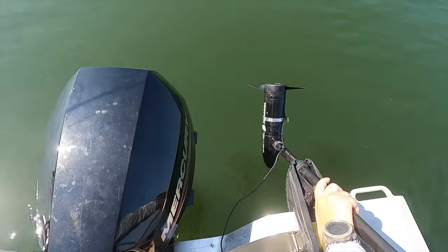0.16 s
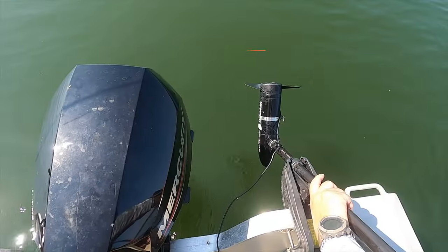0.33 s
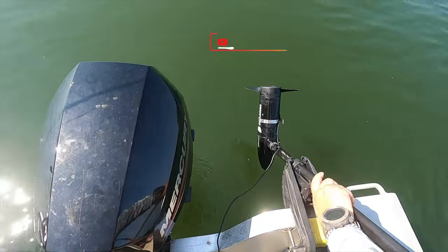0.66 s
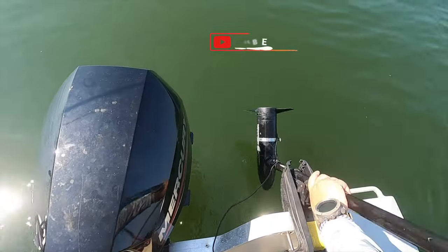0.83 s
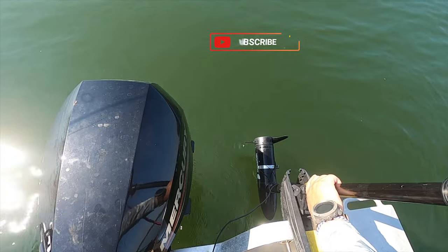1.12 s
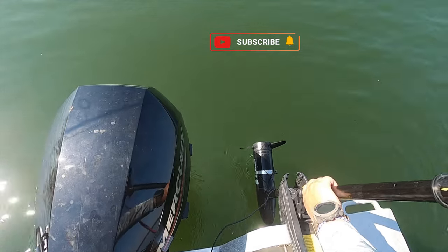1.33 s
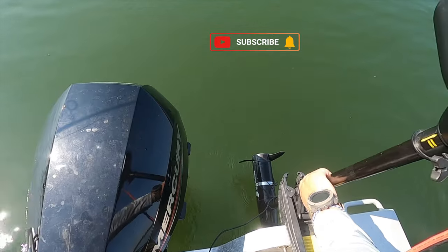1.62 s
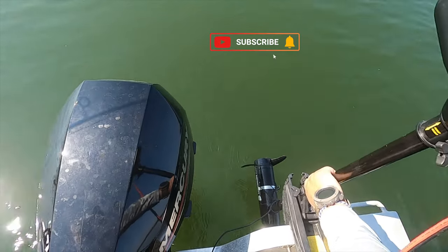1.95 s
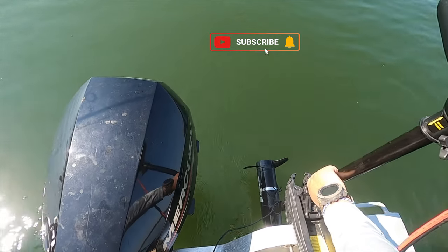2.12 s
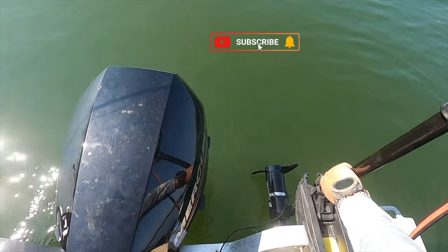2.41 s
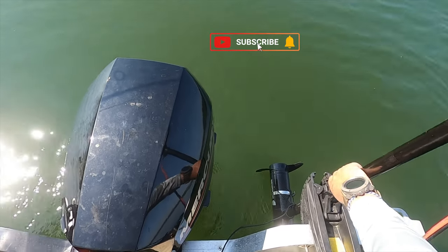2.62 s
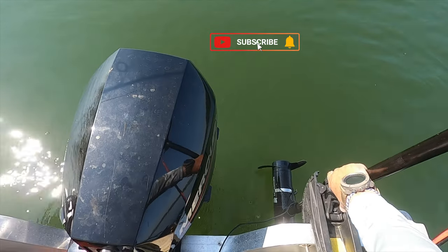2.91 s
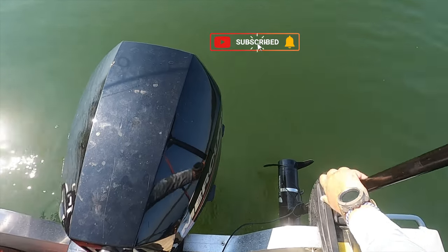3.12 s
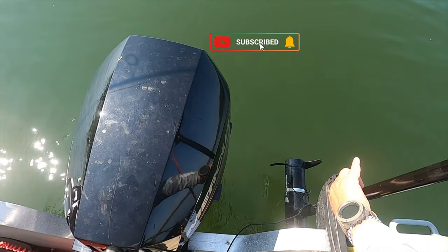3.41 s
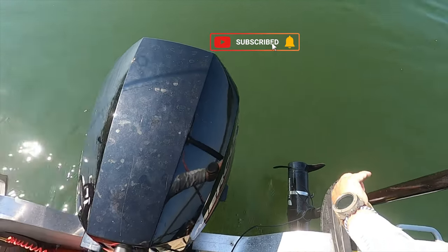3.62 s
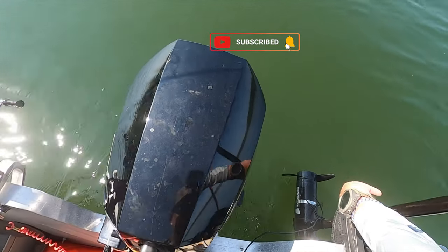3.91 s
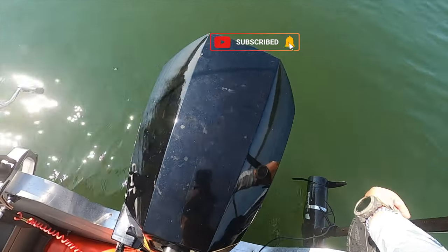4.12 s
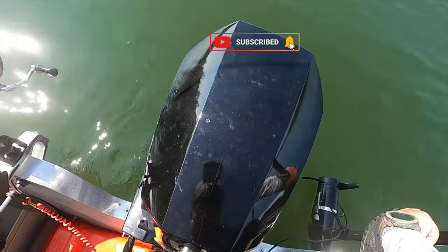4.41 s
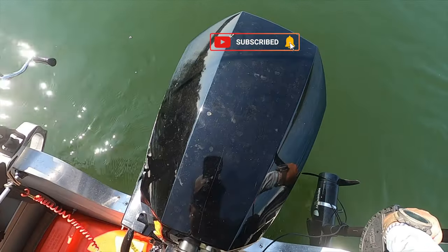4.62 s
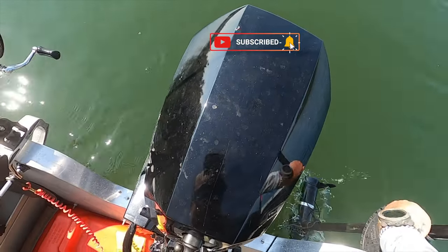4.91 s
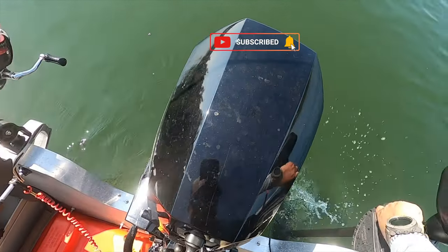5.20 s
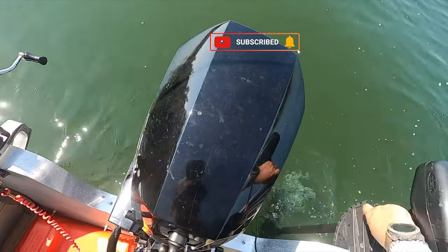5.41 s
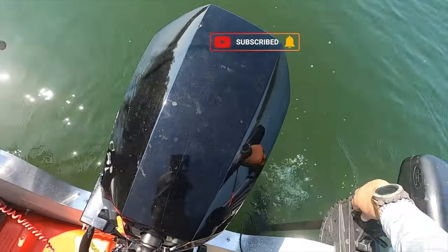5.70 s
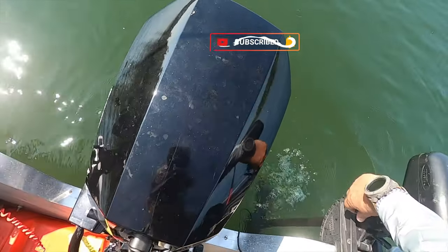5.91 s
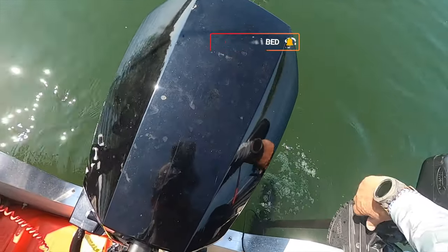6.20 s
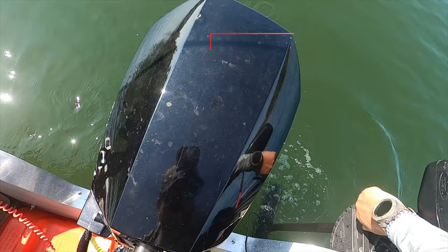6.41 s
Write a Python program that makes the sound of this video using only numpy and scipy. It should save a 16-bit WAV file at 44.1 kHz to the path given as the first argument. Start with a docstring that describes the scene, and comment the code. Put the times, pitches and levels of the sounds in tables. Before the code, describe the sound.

Outdoors on a lake, close stereo microphone worn by the person handling a small outboard on a metal boat. A low, wavering motor hum and soft rumble run throughout, with a faint high insect hiss on the left. From 0.1 s the bracket clacks lightly; a hard clunk lands at 0.65, then dense knocks, gritty scraping and wet slosh peak around 0.95-1.15. It quiets from 1.3 to 2.1, with only faint ticks. A tight clatter with a short scrape comes at 2.4-2.6. From 3 to 4.8 there are sparse small knocks, soft rubbing and tiny chirpy squeaks, notably near 3.75. At 4.9 sliding and clunks resume, building to the loudest rapid thunks at 5.05-5.2, with a deep hull boom and splash. Loose rattles fade by 5.5; small drips and bubbly plips continue over the hum to 6.5.

```python
"""Outboard tipped over a boat's stern

A hand tips a small electric outboard over the stern of a metal boat: its bracket clacks and slides, then drops home
with a boom through the hull and a splash. Contacts are noise bursts ringing modes; water, rubbing and rumble are
shaped noise under gain curves. A motor hums low as wavering tones, water laps and drips as random ringing clicks
and short sines, and insects hiss from the shore as a band of noise.
"""
import sys
import numpy as np
from scipy import signal
from scipy.fft import rfft, irfft
from scipy.io import wavfile
from scipy.ndimage import uniform_filter1d

SR = 44100
rng = np.random.default_rng(int(sys.argv[2]) if len(sys.argv) > 2 else 0)


def log_audio(samples):
    """Write samples as a 16-bit WAV file to the path given in sys.argv[1]."""
    # one column per channel
    frames = np.atleast_2d(samples).T
    # limit to full scale, then quantise
    limited = np.clip(frames, -1, 1)
    pcm = np.round(limited * 32767).astype(np.int16)
    wavfile.write(sys.argv[1], SR, pcm)


N = 288855

# blows on bracket and clamp; clack and crack are relative to the body of the blow, hull to its level:
# start_s, level_db, brightest_hz, clack_db, crack_db, decay_60db_s, hull_db
BLOWS_ON_BRACKET = [(.034, -42, 1480, 1, -15, .046, 6), (.082, -15.5, 1530, -5, -26.5, 0.052, -22),
                    (.102, -27, 1150, -33, -40, 0.084, -19), (.145, -27, 1320, -5, -32, 0.09, -28),
                    (0.199, -42, 900, -1, -32, .034, 17), (0.275, -46, 2500, -2, -29, 0.042, 14),
                    (.315, -29.5, 610, -33, -39, 0.023, 6), (0.402, -28.5, 1780, 2.5, -51, 0.081, 3),
                    (.461, -31.5, 566, -13, -33, 0.068, -13), (0.516, -45.5, 4600, 4, -21, 0.056, -10),
                    (.564, -42, 657, -21, -20, .047, -11), (.587, -37.5, 2210, 3, -17, 0.13, -16),
                    (.655, -8.5, 1890, -5.5, -21.5, 0.039, 3.5), (.687, -28, 540, -21, -31, .05, -11),
                    (.748, -31.5, 605, 2.5, -29, 0.055, -9), (0.798, -27, 560, -27, -39, .045, -16),
                    (.833, -28, 1120, -6, -37, 0.056, 7), (.848, -27, 506, -1.5, -33, 0.25, -7),
                    (.865, -25.5, 1630, 4, -29, .054, 8), (.882, -25.5, 1600, -6, -34, 0.12, 13),
                    (.947, -10, 1030, -0.5, -17, 0.12, -33), (.968, -10, 1110, -26, -20, 0.18, 6),
                    (.991, -23.5, 1110, -12, -7, 0.14, 1), (1.021, -4.5, 740, -7, -15, 0.058, -21),
                    (1.063, -34.5, 664, -14, -27, 0.055, 20.5), (1.099, -19.5, 1220, -25, -36, .086, -6),
                    (1.108, -22.5, 686, -9, -34, 0.058, -4), (1.125, -12, 1184, -2, -55, 0.068, -24),
                    (1.147, -45, 1700, -28, -15, 0.12, 16), (1.217, -26.5, 1620, -37, -26, .088, 5.5),
                    (1.246, -33.5, 1010, -29, -38, 0.043, -17.5),
                    (1.342, -36.5, 1320, -33, -35.5, 0.056, -10.5), (1.539, -51, 517, -33, -27.5, .042, 19),
                    (1.859, -48.5, 534, -9, -28, 0.15, 24), (2.139, -50.5, 2110, 9.5, -3, 0.19, -5),
                    (2.17, -24.5, 810, -2.5, -11.5, 0.059, -22), (2.33, -48, 1660, -25, -22, 0.1, 13),
                    (2.418, -12, 1210, -10, -20, .093, -37.5), (2.461, -12, 1250, -14, -27, 0.13, -29),
                    (2.479, -15, 1700, -2, -50, 0.13, -8), (2.495, -18.5, 650, -21, -31, 0.039, -27.5),
                    (2.507, -26.5, 805, -29, -27, 0.032, 14.5), (2.544, -20, 990, -15, -39, 0.064, -20),
                    (2.57, -29.5, 630, -2.5, -29, 0.08, -17), (2.588, -20.5, 820, -17, -50, 0.13, -39),
                    (2.624, -28.5, 715, -26, -39, 0.088, -6), (2.678, -40.5, 552, -17, -23, .08, 14.5),
                    (2.697, -39.5, 740, -24, -16.5, 0.18, 8.5), (2.966, -41, 1475, -15, -38, 0.14, 2.5),
                    (3.008, -43.5, 546, -4, -21, 0.54, 2), (3.052, -28, 1230, -1, -24, 0.24, -12),
                    (3.089, -27.5, 2230, -28, -23, 0.2, -12), (3.404, -48.5, 2000, -20, -18, 0.54, -10),
                    (3.474, -43, 685, -14, -22, 0.21, -9), (3.523, -44.5, 596, -22, -25, 0.05, -3),
                    (3.6, -45.5, 4500, -10, -19, 0.036, 0), (3.697, -44, 1000, -34, -15, 0.25, 11.5),
                    (3.751, -29.5, 1830, -5, -28, 0.082, -25), (3.767, -32, 557, -13, -21, 0.087, -7),
                    (3.936, -46, 1210, -4, -23, 0.049, 15.5), (4.045, -42.5, 1810, -21, -10, 0.14, -14),
                    (4.087, -34, 506, -25, -20, 0.071, -2), (4.138, -34, 590, -24, -26, .024, -17),
                    (4.163, -37.5, 830, -30, -31, 0.27, 12), (4.332, -49.5, 2400, 19, -27, 0.12, -15),
                    (4.771, -28, 677, -21.5, -34, 0.46, -2), (4.812, -34.5, 1080, -22, -27, .054, 8),
                    (4.873, -37.5, 902, -3, -15, 0.18, 18.5), (4.909, -25, 1690, 7.5, 2, .027, -22),
                    (4.94, -30, 547, 7.5, -17, 0.08, -14), (4.96, -7.5, 437, -11, -25, 0.057, -41),
                    (4.997, -23.5, 1170, 0.5, -9.5, 0.18, -16), (5.041, -19.5, 970, -0.5, -30, 0.091, -22),
                    (5.066, -8.5, 870, -16, -31, 0.035, -31), (5.099, 0.5, 785, -19, -27, 0.07, -44),
                    (5.124, -1, 653, -5, -19, 0.042, -23), (5.13, -8.5, 570, 4.5, -30, 0.022, 10.5),
                    (5.144, -8.5, 1290, -22, -32, 0.22, -15), (5.175, -16.5, 580, -3, -27, 0.06, 11),
                    (5.207, -4, 2360, 2.5, -12.5, 0.074, 7.5), (5.322, -25.5, 623, 0.5, -35, 0.15, 8),
                    (5.349, -28, 1060, -23, -19, 0.091, 9), (5.446, -28.5, 660, -28, -37, 0.1, -16),
                    (5.463, -31, 1260, 0, -10, 0.21, 4), (5.512, -33, 2100, -4, -15, 0.16, -13)]
# strokes of the shaft in its clamp, and a few airy rustles, perhaps of a sleeve;
# at full strength from start_s; rise and fall span 20 dB:
# start_s, rise_s, hold_s, fall_s, slosh_db, rub_db, swish_db
STROKES_AND_RUSTLES = [(.09, 0.034, .005, 0.067, -41.5, -64, -88), (.44, 0.03, 0.004, 0.061, -45, -73, -95),
                       (.66, 0.021, 0.0079, 0.095, -35, -57, -87), (.77, 0.084, 0.21, .05, -45.5, -56, -80),
                       (.96, 0.037, 0.074, 0.023, -30.5, -36, -68),
                       (1.11, 0.061, .005, 0.085, -32.5, -56, -100),
                       (2.26, 0.15, 0.064, 0.12, -63, -68.5, -81),
                       (2.48, 0.059, 0.0083, 0.055, -33.5, -40, -93),
                       (3.07, .03, 0.025, 0.093, -45, -51, -75), (3.14, .2, 0.042, 0.25, -58.5, -55, -70),
                       (4.12, 0.23, 0.017, 0.17, -50, -58, -69.5),
                       (4.42, 0.072, 0.04, 0.11, -59.5, -70, -111),
                       (4.7, 0.17, 0.31, .05, -59.5, -56.5, -76),
                       (4.94, 0.062, 0.13, 0.08, -33.5, -40, -61.5),
                       (5.1, 0.09, 0.12, 0.044, -23.5, -34, -55),
                       (5.27, 0.036, 0.071, 0.2, -38, -51.5, -69),
                       (5.46, 0.078, 0.039, 0.093, -53, -57, -75), (5.74, 0.11, 0.048, .1, -51, -67, -85)]
# the same three sounds in between: time_s, slosh_db, rub_db, swish_db
BETWEEN_STROKES = [(0, -62, -61.5, -91), (1.3, -63.5, -69.5, -95), (2.0, -71.5, -71.5, -103),
                   (2.8, -77, -75, -100), (3.5, -71.5, -68, -100), (5.2, -69, -66, -90),
                   (5.8, -58, -62, -75.5), (6.55, -61.5, -66, -81)]
# lurches of the hull; the fall spans 20 dB: start_s, fall_s, rumble_db, heave_db
HULL_LURCHES = [(.09, 0.15, -39, -67), (.32, .2, -60, -42), (.38, 0.11, -62, -47), (.44, 0.25, -42.5, -65),
                (0.662, 0.097, -24.5, -47), (.78, 0.067, -31.5, -57), (1.04, 0.068, -28.5, -48),
                (1.13, 0.12, -35, -32), (1.46, 0.051, -51, -47), (1.55, 0.047, -40.5, -72),
                (1.85, 0.32, -48.5, -52), (2.45, 0.55, -40.5, -41), (2.57, 0.64, -43, -48),
                (2.7, 0.049, -49, -34), (4.45, .1, -48.5, -50), (4.878, 0.089, -32.5, -53),
                (5.135, 0.15, -12, -10.5), (5.23, 0.16, -18.5, -19), (5.4, 0.13, -40, -31.5),
                (5.62, 0.14, -45, -57), (5.76, 0.067, -44, -65), (6.1, 0.25, -55, -65)]
# the motor as the hull carries it: time_s, hum_db, rumble_db
MOTOR_LEVELS = [(0, -51.5, -44.5), (1.2, -36.5, -49), (1.55, -56.5, -55.5), (2.1, -43, -53.5),
                (2.7, -41.5, -60.5), (4.3, -37.5, -52.5), (4.9, -42.5, -51.5), (5.7, -43, -44),
                (6.55, -41, -45)]


def knocks():
    """Impact excitation: hard blows ring the bracket modes strongly."""
    return blows(BLOWS_ON_BRACKET, rise=.00119, modal=1.1, lag=2)


def blows(table, rise, modal, lag):
    """Modal excitation: a contact chatters in ragged rebounds, rings modes near its brightest pitch, clacks and cracks."""
    # modes of the bracket: mode_hz, level_db, decay_60db_s
    bracket_modes = [(411.2, 3.5, 0.1), (512, -3.5, 0.084), (583.5, -7, 0.075), (677, -41, 0.02),
                     (900, -30, 0.055), (1110, 11.5, 0.019), (1263, 5, 0.017), (1660, 11, 0.017),
                     (1745, -13.5, 0.12), (2012, 8, 0.0078), (2220, -0.5, 0.012), (2700, 8, 0.011),
                     (3346, -7, 0.021), (3460, 0.5, 0.0068), (4530, 15, 0.0061)]
    # the microphone turns with its wearer, so the bracket moves across: time_s, left_minus_right_db
    bracket_pan = [(0, -1.5), (1.3, -2), (1.9, 4), (2.25, 0), (2.45, -2.5), (2.9, -3.5), (3.1, 7.5),
                   (4.2, -3), (4.75, -3), (5.5, -1), (6.55, 4)]
    out, size = np.zeros((2, N)), int(.22 * SR)
    pans = in_time(bracket_pan)[0]
    t = np.arange(size) / SR
    clack_band = signal.butter(2, [1900, 4600], "band", fs=SR, output="sos")
    crack_band = signal.butter(2, [5000, 10500], "band", fs=SR, output="sos")
    plastic = signal.butter(2, 7000, fs=SR, output="sos")   # padded parts swallow the highest ring
    small = signal.butter(2, 260, "high", fs=SR, output="sos")   # small parts radiate no bass
    for s, db, hz, clack_db, crack_db, t60, *_ in table:
        fade = np.minimum(t / rise, 1) ** 2 * amp(-60 * np.maximum(t - rise, 0) / t60)
        uneven = amp(3.5 * np.repeat(rng.standard_normal(size // 40 + 1), 40)[:size])
        chatter = rng.standard_normal((4, size)) * fade * uneven
        chatter[:, int(rise * SR)] += 4.0      # the first touch is the hardest
        body = ring(chatter[0], hz, 7.5 / hz)

        rings = np.zeros(size)
        for mode_hz, level_db, ring_s in bracket_modes:
            nearness_db = -2.3 * np.log2(mode_hz / hz) ** 2
            mode_gain = amp(level_db + rng.normal(0, 4) + nearness_db)
            rings += mode_gain * ring(chatter[0] * fade, mode_hz, ring_s)
        body = peak_one(peak_one(body) + modal * peak_one(rings))
        body = signal.sosfilt(small, signal.sosfilt(plastic, body))

        # shared chatter plus each port's own: the cracks differ more between the ports
        clacks = signal.sosfilt(clack_band, (chatter[1] + 0.21 * chatter[2:]) * fade)
        clacks = signal.sosfilt(plastic, clacks)
        cracks = signal.sosfilt(crack_band, (chatter[1] + 6.3 * chatter[2:]) * fade)
        i = round(s * SR)
        for side, start in enumerate([i + lag, i]):
            n, sign = min(size, N - start), 1 - 2 * side
            sound = body + amp(clack_db) * peak_one(clacks[side]) + amp(crack_db) * peak_one(cracks[side])
            out[side, start:start + n] += amp(db + pans[i] / 2 * sign) * sound[:n]
    return out


def hull():
    """Structure-borne sound: each knock reaches the hull as a rounded push and rings its modes."""
    # modes of the hull: mode_hz, level_db, decay_60db_s
    hull_modes = [(49.4, -16.5, 0.18), (88.6, -15, 0.14), (118.8, -13, 0.43), (148, 12, 0.16),
                  (213, -19.5, 0.36), (351.4, 7.5, 0.13)]
    push = np.zeros(N)
    for s, db, *_, hull_db in BLOWS_ON_BRACKET:
        push[round(s * SR)] = amp(db + hull_db)
    soft = signal.sosfilt(signal.butter(2, 500, fs=SR, output="sos"), push)
    return amp(-26) * sum(amp(level) * ring(soft, hz, t60) for hz, level, t60 in hull_modes)


def rub():
    """Friction noise: rubbing is made of random gritty clicks over noise."""
    # spectrum of the rubbing: frequency_hz, density_db
    rub_spectrum = [(880, -18), (1500, -0.5), (1650, -7), (2060, -7), (2630, -6.5), (3600, -6.5),
                    (4350, -5), (5880, -11), (6950, -13.5), (8000, -12.5), (10400, -44.5), (17600, -120)]
    grains = grit(1200 * amp(3.3 * drift(13.0)), 1.8, 0.48)
    sound = ports(shaped(grains, rub_spectrum), 1.41, 0.9)
    return sound * stroke_gains()[1] * amp(3.3 * drift(33))


def swish():
    """Broadband noise: dense fine clicks make the airy swish of strokes and rustles."""
    # spectrum of the swish: frequency_hz, density_db
    swish_spectrum = [(4590, -18.5), (7800, -11.5), (8550, 11.5), (10100, 3), (14200, -2), (15800, -44.5)]
    sound = ports(shaped(grit(3600, 2.5, .3), swish_spectrum), 4.5, 1.0)
    return sound * stroke_gains()[2] * amp(1.5 * drift(25)) * amp([[-1.5], [1.5]])


def slosh():
    """Random resonance: small bubbles and chatter each ring some cycles at a pitch of their own."""
    clicks = grit(900 * amp(5 * drift(10)), 3.6, .15)
    pitches, dealt = np.geomspace(450, 2600, 18), rng.integers(0, 18, N)
    patches = [4 * drift(7) for _ in range(6)]   # three neighbouring pitches swell together
    wet = 0
    for k, hz in enumerate(pitches):
        gain = amp(patches[k // 3] - 0.83 * np.log2(hz / 950) ** 2)
        wet = wet + gain * ring(clicks * (dealt == k), hz, 20.0 / hz)
    return ports(rms_one(wet), 2.3, 0.38) * stroke_gains()[0]


def splats():
    """Impact excitation: drops smack the surface with a faster rise and only faint modal ringing."""
    # drops: start_s, level_db, brightest_hz, clack_db, crack_db, decay_60db_s (clack and crack relative to body)
    drops = [(5.552, -36, 3460, -13, -11, .017), (5.579, -43, 2030, 2, -6, 0.017),
             (5.67, -25.5, 5030, -11.5, -33, 0.043), (5.704, -44.5, 1800, 4.5, 7, 0.026),
             (5.792, -30.5, 4450, -14, -6, 0.012), (5.864, -37.5, 1710, -19, 4.5, 0.025),
             (5.948, -52, 7000, -25, 13, 0.034), (5.995, -44, 6860, -17, 6, .018),
             (6.019, -28, 5730, -25, -30, .027), (6.135, -38, 6940, -14, -8, 0.024),
             (6.156, -39.5, 1560, -18, -29, 0.14), (6.359, -51, 6700, -24, 1, 0.023),
             (6.464, -55, 6970, -6, -20, 0.017)]
    return blows(drops, rise=.0004, modal=.06, lag=2)


def short_tones():
    """Frequency modulation: each tone is a short, shaky sine that slides up or down in pitch."""
    # short tones: bubbles, squeaks and one lingering ring of the bracket:
    # start_s, level_db, start_hz, rise_octaves, length_s
    tones = [(1.132, -52.5, 1723, -0.27, 0.15), (1.772, -58.5, 2020, -0.16, 0.013),
             (1.802, -60, 2700, -0.13, 0.013), (2.212, -45.5, 1100, 1.15, 0.03),
             (3.388, -56.5, 2037, -0.65, 0.055), (3.742, -27, 2090, -0.072, 0.017),
             (3.754, -33, 1690, -0.06, .008), (3.752, -29.5, 1255, 0.097, 0.0049),
             (3.989, -48, 780, 0.2, 0.015), (4.044, -43, 1784, -0.012, 0.024),
             (4.09, -38, 338, 0.17, 0.015), (4.134, -36, 367.5, 0.22, 0.043),
             (4.172, -41, 1017, -0.14, 0.02), (4.233, -51.5, 1070, 0.18, 0.043),
             (5.259, -40, 1050, 0.0088, 0.055), (5.507, -52, 4140, 0.47, 0.037),
             (5.549, -52, 2860, 0.45, 0.0087), (4.461, -57, 1110, 0.14, 0.061),
             (5.382, -36, 1120, 0.023, 0.028), (5.48, -34.5, 900, 1.54, 0.014),
             (3.769, -37.5, 4140, -0.2, 0.0092), (5.715, -46, 1050, -0.28, 0.055),
             (5.742, -39, 919, 0.084, 0.025), (5.776, -39.5, 519, -0.11, 0.04)]
    out, shake = np.zeros(N), drift(123)
    for s, db, hz, rise, length in tones:
        u = np.arange(int(1.1 * length * SR)) / SR / length   # the tail runs a tenth past the length
        shape = np.minimum(u / 0.019, 1) * np.exp(-1.5 * u ** 2)
        i = round(s * SR)
        pitch = hz * 2 ** (rise * u + 0.12 * shake[i:i + len(u)])
        out[i:i + len(u)] += amp(db) * shape * np.sin(2 * np.pi * np.cumsum(pitch) / SR)
    return out * amp(4 * drift(150)) * amp([[-0.6], [0.6]])


def rumble():
    """Forced vibration: lurches and the motor shake the hull into low noise."""
    # spectrum of the rumble: frequency_hz, density_db
    rumble_spectrum = [(32, -39.5), (55, -20.5), (92, 9.5), (113, -2.5), (167, 4.5), (200, 1), (286, -6),
                       (449, -11), (600, -33.5), (780, -88.5), (1320, -120)]
    gain = np.hypot(lurch_gains()[0], amp(in_time(MOTOR_LEVELS)[1]))
    sound = ports(shaped(rng.standard_normal((2, N)), rumble_spectrum), 7.5, .045)
    return sound * gain * amp(2.0 * drift(9.1))


def heave():
    """Forced vibration: the hull heaves as deep noise, never quite at rest."""
    # spectrum of the heave: frequency_hz, density_db
    heave_spectrum = [(18, -22), (30, -21.5), (50, -8), (62, -9), (90, -43)]
    gain = np.hypot(lurch_gains()[1], amp(-66.5 + 2 * drift(2.5)))
    return ports(shaped(rng.standard_normal((2, N)), heave_spectrum), 2.2, .04) * gain


def hum():
    """Resonant selection: hull panels pick a few wavering tones out of the motor's shaking."""
    # tones; the width sets both the pitch wander and the rate of the level wander: pitch_hz, width_hz, level_db
    hum_tones = [(62.2, 1.8, -13), (82, 3.65, -7), (137.6, 4.11, -9), (182.6, 2.86, -23.5)]
    t, out = np.arange(N) / SR, 0
    for hz, width, db in hum_tones:
        phase = 2 * np.pi * (hz * t + np.cumsum(0.3134 * width * drift(3.0)) / SR)
        out = out + amp(db + 2.8 * drift(width)) * np.sqrt(2) * np.sin(phase)
    return amp(in_time(MOTOR_LEVELS)[0]) * out


def insects():
    """Superposition: a far chorus blurs to a smooth band of hiss from the left."""
    # spectrum of the chorus: frequency_hz, density_db
    insect_spectrum = [(3000, -33), (4300, -31.5), (5000, -10), (5500, -4.5), (5950, -1), (6300, -2),
                       (6950, 4), (7400, -2.5), (8000, -13), (8300, -23.5), (9200, -42.5), (11000, -66.5)]
    # the chorus swells slowly: time_s, level_db
    chorus_swell = [(0, -61.5), (1.8, -62.5), (2.6, -60.5), (4.1, -58), (5.0, -62), (6.55, -61)]
    pan_db = 11.5
    band = ports(shaped(rng.standard_normal((2, N)), insect_spectrum), 4.92, 0.7)
    return band * amp(in_time(chorus_swell)[0] + 1.7 * drift(24)) * amp([[pan_db / 2], [-pan_db / 2]])


def stroke_gains():
    """Power addition: strokes and rustles over the resting level, as gains of slosh, rub and swish."""
    return np.hypot(swells(STROKES_AND_RUSTLES), amp(in_time(BETWEEN_STROKES)))


def lurch_gains():
    """Transient envelope: each lurch rises 20 dB in 0.019 s; gains of rumble and heave."""
    return swells([(s, .019, 0, *rest) for s, *rest in HULL_LURCHES])


def swells(rows):
    """Exponential growth and decay: rise and fall span 20 dB, powers add up, one gain row per level."""
    t, out = np.arange(N) / SR, 0
    for s, rise, hold, fall, *levels_db in rows:
        below = np.maximum(s - t, 0) / rise + np.maximum(t - s - hold, 0) / fall
        out = out + amp(levels_db)[:, None] ** 2 * amp(-40 * np.minimum(below, 6))   # power, so 40 for 20 dB
    return np.sqrt(out)


def grit(per_s, spread_db, smooth):
    """Poisson impulses: random clicks of uneven size over some smooth noise."""
    sizes = amp(spread_db * np.minimum(rng.exponential(1, (2, N)), 5)) * rng.standard_normal((2, N))
    return sizes * (rng.random((2, N)) < per_s / SR) + smooth * rng.standard_normal((2, N))


def ring(x, hz, t60):
    """Damped resonance: a unit click sets a sine of height 1 ringing."""
    r, w = amp(-60 / (t60 * SR)), 2 * np.pi * hz / SR
    return signal.lfilter([0, np.sin(w)], [1, -2 * r * np.cos(w), r * r], x + 1e-18)


def shaped(x, spectrum):
    """Linear filtering: gives a steady excitation a spectrum, interpolated over log frequency; rms 1."""
    hz, db = np.transpose(spectrum)
    bins = np.arange(N // 2 + 1) * SR / N + 1e-3
    gain = amp(np.interp(np.log(bins), np.log(hz), db, left=-90, right=-90))
    return rms_one(irfft(rfft(x) * gain, N))


def ports(x, lag, apart):
    """Partial coherence: the left port hears lag samples late, and each adds a little sound of its own."""
    late = irfft(rfft(x[0]) * np.exp(-2j * np.pi * lag * np.arange(N // 2 + 1) / N), N)
    return np.array([late + apart * x[1], x[0] - apart * x[1]]) / np.sqrt(1 + apart ** 2)


def drift(rate):
    """Low-passed noise: slow chance of spread 1, with two poles at rate in Hz."""
    r = np.exp(-80 * np.pi * rate / SR)   # one step is 40 samples
    slow = signal.lfilter([1], [1, -2 * r, r * r], rng.standard_normal(N // 40 + 2002))[2000:]
    return np.interp(np.arange(N) / 40, np.arange(len(slow)), rms_one(slow))


def in_time(rows):
    """Linear interpolation: one curve over time for each column after the first."""
    s, *columns = np.transpose(rows)
    return [np.interp(np.arange(N) / SR, s, c) for c in columns]


def amp(db):
    """Decibel law: 20 dB is a factor of ten in amplitude."""
    return 10 ** (np.asarray(db) / 20)


def rms_one(x):
    """Power normalisation: scales to rms 1."""
    return x / np.sqrt(np.mean(x ** 2) + 1e-20)


def peak_one(x):
    """Peak normalisation: scales to a peak of 1."""
    return x / np.abs(x).max()


def scene():
    """Superposition: all sources add linearly."""
    contact = knocks() + hull() + rub() + swish()
    water_and_tones = slosh() + splats() + short_tones()
    return contact + water_and_tones + rumble() + heave() + hum() + insects()


def gain_control(x):
    """Dynamic compression: loud moments turn the gain down by a share of their excess; it creeps back slowly."""
    loud_db, squeeze, recover_db_per_s, react_s = -18.5, 0.41, 5, .03
    level_db = 10 * np.log10(uniform_filter1d(np.mean(x ** 2, axis=0), size=441) + 1e-12)   # over 10 ms
    creep = recover_db_per_s * np.arange(N) / SR
    wanted_db = squeeze * np.maximum(level_db - loud_db, 0)
    cut_db = np.maximum.accumulate(wanted_db + creep) - creep
    r = np.exp(-1 / (react_s * SR))
    return x * amp(-signal.lfilter([1 - r], [1, -r], cut_db))


def record(dry):
    """Shadowing and saturation: the housing dulls the left port, gain is controlled, peaks rounded, the top cut."""
    shade_share, shade_hz, left_db, cutoff_hz = 0.46, 6000, .5, 16000
    shade = signal.sosfilt(signal.butter(1, shade_hz, fs=SR, output="sos"), dry[0])
    left = amp(left_db) * ((1 - shade_share) * dry[0] + shade_share * shade)
    heard = gain_control(np.array([left, dry[1]]))
    rounded = 1.275 * np.tanh(heard / 1.325)
    return signal.sosfilt(signal.cheby2(12, 70, cutoff_hz, fs=SR, output="sos"), rounded)


dry = scene()
out = record(dry)
log_audio(out)
```